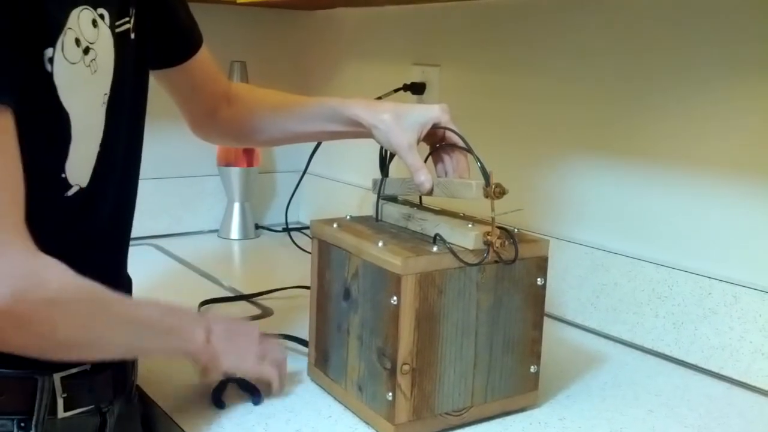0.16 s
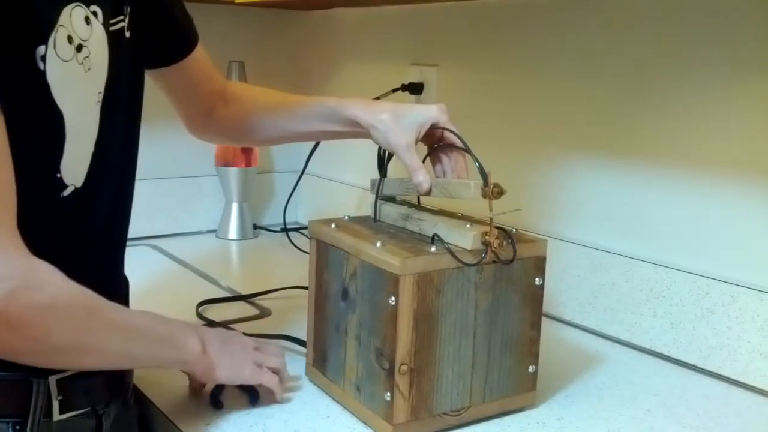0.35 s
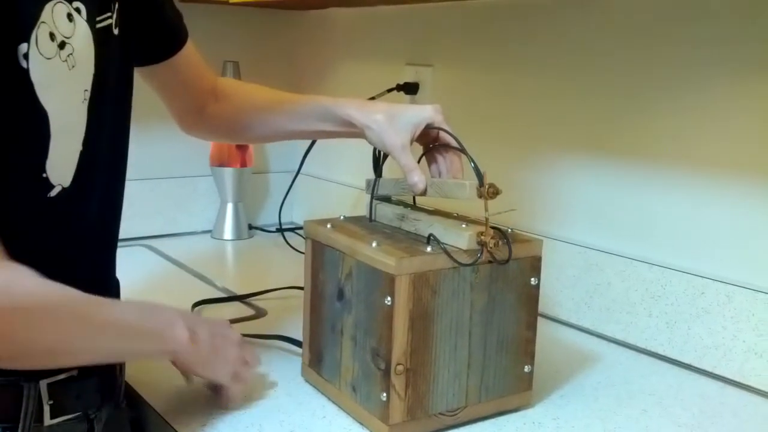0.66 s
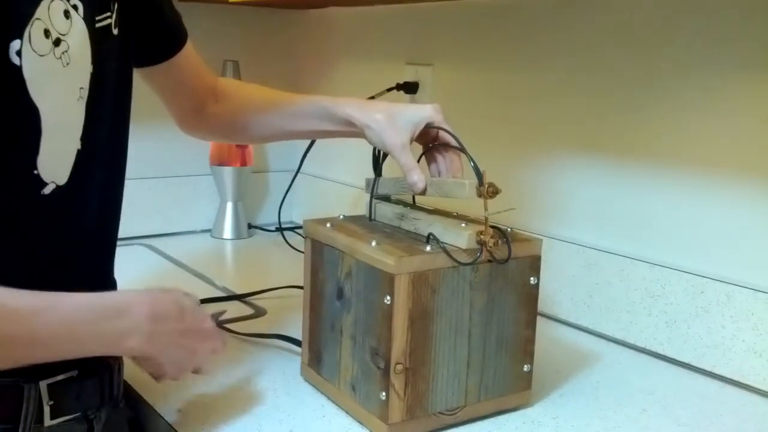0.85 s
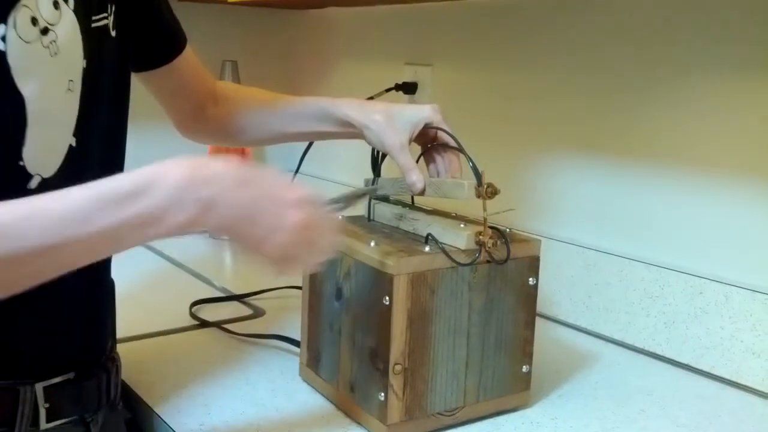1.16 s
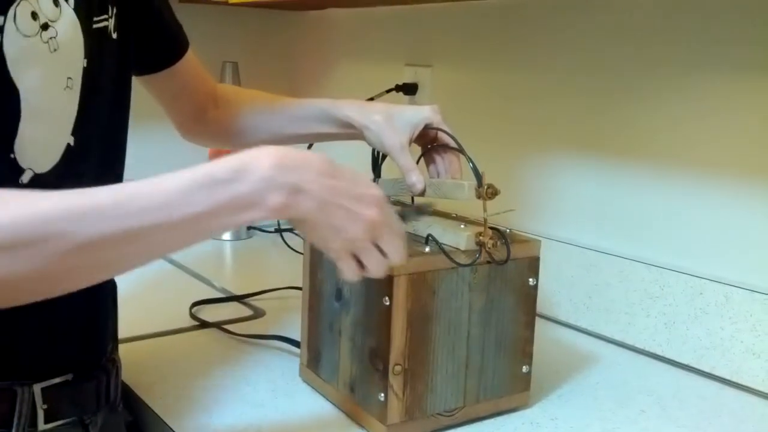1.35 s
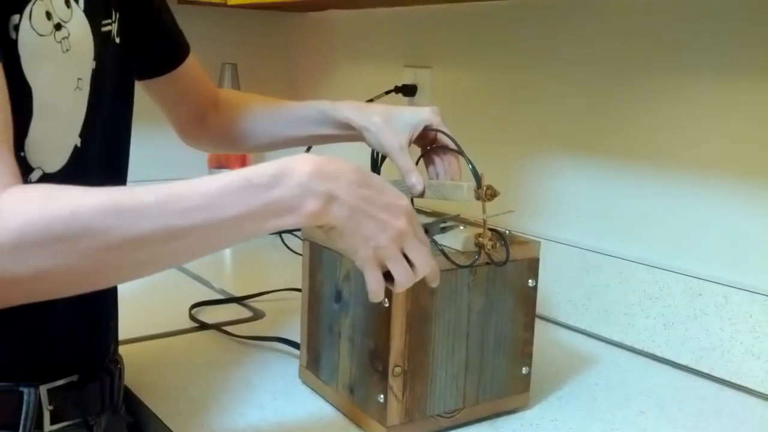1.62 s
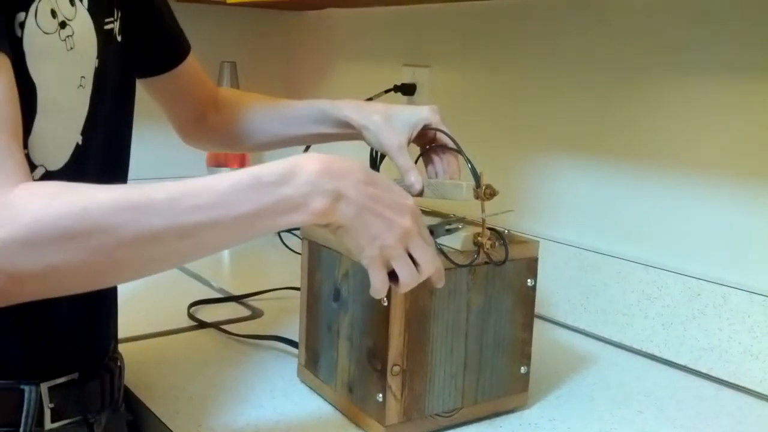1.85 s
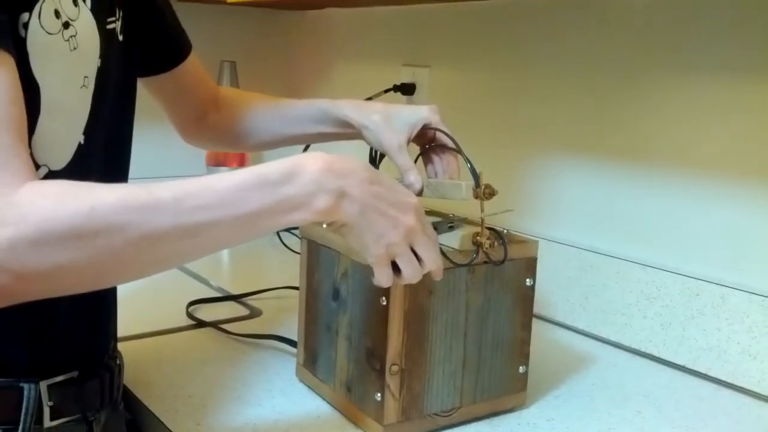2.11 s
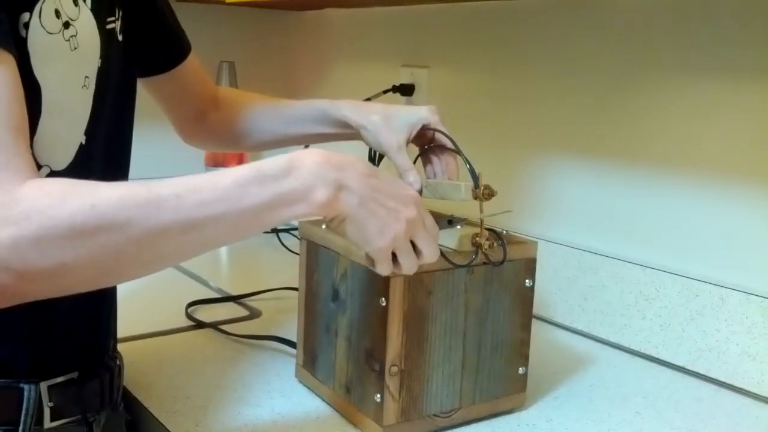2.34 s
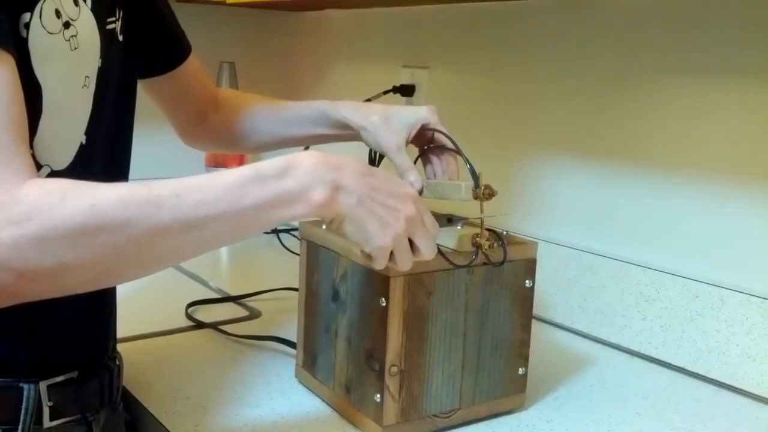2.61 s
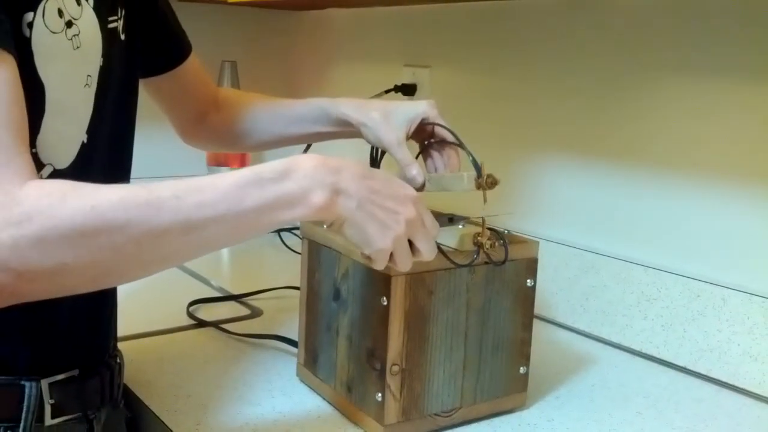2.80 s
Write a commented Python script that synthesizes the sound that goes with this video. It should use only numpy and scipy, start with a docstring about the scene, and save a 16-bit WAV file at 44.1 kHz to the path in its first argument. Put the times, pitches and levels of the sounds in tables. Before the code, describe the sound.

One sharp, bright click from small pliers comes at about 1.4 seconds. Before it, light scuffs and a soft bump mark the tool being picked off a counter. A faint metal touch follows at 2 seconds, then a small clink with a knock on a wooden box at 2.3. Soft rubbing and dull bumps come near 2.8. Low electrical hum and faint hiss fill the small room throughout.

```python
"""Light scuffs over mains hum and room rumble, as a hand picks small pliers off a counter in a small room.
The tool gives one sharp snap, then its metal rings in two small clinks as it is set against a homemade
spot welder, and the welder's wooden box rings with a knock. The scuffs are showers of tiny slips;
a few soft bumps wake only low modes. The recorder's own hiss, whine and faint regular ticks lie beneath."""
import sys
import numpy as np
from scipy import signal
from scipy.fft import rfft, irfft
from scipy.io import wavfile

SR = 44100
rng = np.random.default_rng(int(sys.argv[2]) if len(sys.argv) > 2 else 0)


def inscribe(sig):
    """Save sig as 16-bit PCM at rate SR to the path in sys.argv[1].

    A 1-D sig is mono; a 2-D sig holds one channel per row.
    Samples are clipped to [-1, 1] before scaling.
    """
    pcm = np.round(np.clip(np.atleast_2d(sig).T, -1, 1) * 32767)
    wavfile.write(sys.argv[1], SR, pcm.astype(np.int16))


N = 130977

# Room rumble and recorder hiss. Each row: frequency in Hz, level in dB per Hz.
NOISE_BED = [(15, -83), (30, -102), (70, -76.5), (110, -83), (165, -75.5), (205, -82.5), (255, -75),
             (340, -85.5), (430, -87), (600, -87.5), (1000, -90.5), (1700, -101), (3000, -104),
             (4800, -111), (8500, -111), (12500, -107), (14300, -103.5), (15700, -106)]
# A faint drone and the recorder's whine. Each row: centre in Hz, width in Hz, level in dB per Hz.
WHINE_BANDS = [(464, 10.5, -77), (6840, 58, -108), (10270, 113, -98), (12020, 33, -100), (13700, 71, -91.5),
               (15700, 38, -94.5)]
# Mains hum and faint machine tones. Each row: pitch in Hz, level in dB.
HUM_TONES = [(23, -63.5), (51.3, -60.5), (58.6, -61.5), (120, -51), (1124, -84), (1242, -100),
             (1301, -74.5), (2659, -94.5)]
HUM_WAVER_DEPTH, HUM_WAVER_HZ = 0.059, 4.4
# A hum overtone that swells late on. Each row: time in seconds, level in dB.
OVERTONE_HZ, OVERTONE_DB = 179, [(0, -62), (1.95, -65), (2.1, -56), (2.97, -60)]

# Fingers and tool scuff the counter, the hand drags dully on wood, and both rub on the box.
# Each row: start, rise and decay in seconds, level in dB.
SCUFFS = [(0, 0.0026, .03, -63), (.172, 0.0048, 0.015, -54.5), (.3, 0.022, 0.051, -60),
          (.418, 0.0052, .015, -64.5), (.747, 0.0034, 0.0062, -56.5)]
DRAGS = [(.165, 0.017, 0.043, -52), (2.787, 0.0096, 0.017, -50)]
RUBS = [(1.995, .01, .05, -62), (2.788, .01, .03, -55)]
# The tone of each kind of stroke. Each row: frequency in Hz, gain in dB.
SCUFF_EQ = [(200, 8), (1600, 4.5), (2200, 6.5), (2600, 1), (3100, 1), (4200, 2), (7000, -3), (12000, 0),
            (16000, -3)]
DRAG_EQ = [(20, -15), (60, -1), (170, 3), (270, -4), (600, -9), (1200, -15), (2500, -39), (8000, -62)]
RUB_EQ = [(100, -10), (550, 0), (800, -3), (1100, 4), (1350, -4), (1560, 3), (2200, -8), (4000, -22),
          (12000, -32)]
GRAINS_PER_S, GRAIN_SPREAD_DB = 2300, 3.5

TICK_FIRST_S, TICK_PERIOD_S = .1623, 1.2827
# The three pulses in a tick: their delays in seconds, then their levels in dB.
TICK_DELAYS_S = [0, .0066, .0384]
TICK_LEVELS_DB = [-26, -35, -36]
# The tick's thin, bright tone. Each row: frequency in Hz, gain in dB.
TICK_EQ = [(500, -41), (4000, -21), (7000, -9), (10500, -6.5), (13300, 5), (16000, -2)]

# Soft bumps on the counter and box. Each row: start in seconds, level in dB.
BUMPS = [(.775, -37), (1.44, -41.5), (2.793, -36), (2.938, -36.5)]
# Their dull ring. Each row: pitch in Hz, level in dB, seconds to fall by 60 dB.
BUMP_MODES = [(91, -1, 0.32), (155, -3, 0.12)]
BUMP_CONTACT_S = 0.0024

# The tool's snap. Its one row: start in seconds, level in dB.
SNAP = [(1.3682, -12)]
# Its hard, bright tone. Each row: frequency in Hz, gain in dB.
SNAP_EQ = [(300, -28), (1200, -9.5), (2200, -13.5), (3600, -2), (5200, -6.5), (7500, -8.5), (9500, -5),
           (11800, 0.5), (13500, -6), (16000, -11)]
SNAP_BASS_LAG_S = 0.00032

# Metal touches metal, then the plier tips catch and slip. Each row: start in seconds, level in dB.
TOUCHES = [(1.9937, -53), (1.9965, -52)]
CLINKS = [(2.3026, -45), (2.3053, -39), (2.3182, -47)]
# The tool lands on the box. Each row: start in seconds, level in dB, contact time in milliseconds.
KNOCKS = [(2.3180, -50.5, .02), (2.3200, -40.5, 0.16), (2.3237, -46, 0.1)]
# The ring of the touched metal, the tips, and the box with its fittings.
# Each row: pitch in Hz, level in dB, seconds to fall by 60 dB.
TOUCH_MODES = [(6540, -5, .035), (7780, -9, 0.066), (10440, -3, .035), (11250, -2, .022), (12500, -3, .015),
               (13050, -3, .015)]
CLINK_MODES = [(11300, 4, 0.0088), (12040, -1, 0.024), (12400, -2, .013), (12400, -9, .01),
               (15000, -8, .012), (15350, -6, 0.023)]
BOX_MODES = [(312, 2.5, 0.057), (367, -6, 0.12), (424, -14, .06), (554, -7, 0.1), (780, -11, 0.094),
             (1020, -5.5, 0.079), (1116, 1.5, 0.085), (1548, 0, 0.066), (1680, -15, 0.05),
             (2280, -10, 0.043), (2673, -11, .05), (2896, -3.5, 0.052), (3550, -6, 0.052),
             (8970, 7.5, .017)]
# The grit on each of those attacks. Each row: frequency in Hz, gain in dB.
TOUCH_CRACK_EQ = [(1000, 24), (5000, 2), (6500, 17), (12500, 16.5), (15500, 18)]
CLINK_CRACK_EQ = [(500, -4), (2000, 4), (2900, 9), (4200, 12), (6000, 3), (8300, -6), (11500, 22),
                  (15500, 13)]
BOX_CRACK_EQ = [(150, 5), (400, 33.5), (750, 35), (1100, 30.5), (2000, 29.5), (3400, 32), (4600, 22),
                (7500, 25.5), (9000, 24), (15000, 18)]

# Early reflections off nearby surfaces. Each row: delay in seconds, level in dB.
ECHOES = [(.0015, -56.5), (.0032, -10), (.0054, -23.5), (0.0083, -9)]
# The room's tail. Each row: frequency in Hz, seconds to fall by 60 dB.
ROOM_T60 = [(150, 0.49), (1000, 0.11), (4000, 0.13), (10000, 0.15), (16000, 0.089)]
ROOM_TAIL_DB = -1
BASS_CUT_HZ, TOP_EDGE_HZ = 18, 15850


def amp(db):
    """Decibels to gain."""
    return 10 ** (np.asarray(db) / 20)


def unit_rms(x):
    """Scales to an rms of one."""
    return x / np.sqrt(np.mean(x ** 2) + 1e-20)


def curve_at(points, hz):
    """Reads a curve along a logarithmic frequency axis."""
    point_hz, value = np.transpose(points)
    return np.interp(np.log(hz + 1), np.log(point_hz + 1), value)


def add(mix, start_s, sound):
    """Lays a sound into the mix at its cue."""
    part = mix[max(round(start_s * SR), 0):][:len(sound)]
    part += sound[:len(part)]


def impulses(rows):
    """One impulse for each row of start and level."""
    out = np.zeros(N)
    for start_s, db in rows:
        add(out, start_s, amp([db]))
    return out


def equalise(x, eq, size=4096):
    """Minimum-phase EQ: attacks stay sharp."""
    hz = abs(np.fft.fftfreq(size, 1 / SR))
    log_gain = np.log(amp(curve_at(eq, hz)))
    taps = np.fft.ifft(np.exp(np.conj(signal.hilbert(log_gain)))).real
    return signal.fftconvolve(x, taps[:size // 2])[:N]


def hum_and_hiss():
    """The bed: steady rumble and hiss, narrow whining bands of noise and gently wavering hum."""
    hz, t = np.fft.rfftfreq(N, 1 / SR), np.arange(N) / SR
    whine = sum(amp(db) ** 2 / (1 + ((hz - centre) / width * 2) ** 2)
                for centre, width, db in WHINE_BANDS)
    power = amp(curve_at(NOISE_BED, hz)) ** 2 + whine
    out = irfft(rfft(rng.standard_normal(N)) * np.sqrt(power * SR / 2), N)
    swell_db = np.interp(t, *np.transpose(OVERTONE_DB))
    for pitch, db in HUM_TONES + [(OVERTONE_HZ, swell_db)]:
        waver = unit_rms(irfft(rfft(rng.standard_normal(N)) * np.exp(-hz / HUM_WAVER_HZ), N))
        tone = np.sqrt(2) * np.sin(2 * np.pi * (pitch * t + rng.random()))
        out += amp(db) * (1 + HUM_WAVER_DEPTH * waver) * tone
    return out


def friction(strokes, eq):
    """Dense tiny slips that swell and die with each stroke."""
    t = np.arange(N) / SR
    grains = rng.standard_normal(N) * amp(GRAIN_SPREAD_DB * rng.standard_normal(N))
    grains *= rng.random(N) < GRAINS_PER_S / SR
    envelope = np.zeros(N)
    for start, rise, decay, db in strokes:
        attack = np.clip((t - start) / rise, 0, 1)
        release = np.exp(-np.maximum(t - start - rise, 0) / decay)
        envelope += amp(db) * attack * release
    return envelope * unit_rms(equalise(grains, eq))


def ticks():
    """Dry electrical ticks on a steady beat, each a pulse with two fainter ones in tow."""
    starts = np.arange(TICK_FIRST_S, N / SR, TICK_PERIOD_S)
    pulses = [(start + delay, db) for start in starts for delay, db in zip(TICK_DELAYS_S, TICK_LEVELS_DB)]
    return equalise(impulses(pulses), TICK_EQ)


def ring(modes):
    """The dying modes of a struck object; neighbours swing in opposite directions."""
    t = np.arange(SR // 2) / SR
    return sum((-1) ** k * amp(db - 60 * t / t60) * np.sin(2 * np.pi * hz * t)
               for k, (hz, db, t60) in enumerate(modes))


def bumps():
    """Slow, soft pushes that wake only the lowest modes."""
    t = np.arange(SR // 20) / SR
    push = t * np.exp(-t / (BUMP_CONTACT_S / 2))
    thud = np.convolve(ring(BUMP_MODES), push / push.sum())
    return signal.fftconvolve(impulses(BUMPS), thud)[:N]


def snap():
    """One sharp release of the tool; the metal carries treble faster than bass."""
    hz = np.fft.rfftfreq(N, 1 / SR)
    lag_s = SNAP_BASS_LAG_S * np.maximum(1 - hz / TOP_EDGE_HZ, 0)
    phase = 2 * np.pi * np.cumsum(lag_s) * SR / N
    force = irfft(rfft(impulses(SNAP)) * np.exp(-1j * phase), N)
    return equalise(force, SNAP_EQ)


def strike(modes, crack_eq, crack_s):
    """A short gritty crack of contact on top of the object's ring."""
    body = ring(modes)
    t = np.arange(len(body)) / SR
    crack = rng.standard_normal(len(t)) * np.exp(-t / crack_s)
    return body + equalise(crack / np.linalg.norm(crack), crack_eq)[:len(t)]


def metal_clinks():
    """Light touches of the tool, then the clink of its tips: quick clusters of high, short rings."""
    touches = signal.fftconvolve(impulses(TOUCHES), strike(TOUCH_MODES, TOUCH_CRACK_EQ, crack_s=.0017))
    clinks = signal.fftconvolve(impulses(CLINKS), strike(CLINK_MODES, CLINK_CRACK_EQ, crack_s=.0015))
    return (touches + clinks)[:N]


def box_knock():
    """Three quick contacts blend into one knock on the wooden box; a longer contact sounds duller."""
    out = np.zeros(N)
    for start_s, db, contact_ms in KNOCKS:
        hit = strike(BOX_MODES, BOX_CRACK_EQ, crack_s=.0046)
        softness = np.exp(-1000 / (contact_ms * SR))  # pole of a low-pass
        add(out, start_s, amp(db) * signal.lfilter([1 - softness], [1, -softness], hit))
    return out


def room(x):
    """The direct sound, echoes from counter and wall, and a short diffuse tail."""
    hz, t, noise = signal.stft(rng.standard_normal(SR // 2), SR, nperseg=256)
    decay = amp(-60 * t / curve_at(ROOM_T60, hz)[:, None])
    tail = signal.istft(noise * decay, SR, nperseg=256)[1]
    tail *= np.minimum(np.arange(len(tail)) / SR / 0.0023, 1)  # 2.3 ms fade-in
    direct_and_echoes = impulses([(0, 0.011)] + ECHOES)[:len(tail)]
    response = direct_and_echoes + amp(ROOM_TAIL_DB) * tail / np.linalg.norm(tail)
    return signal.fftconvolve(x, response)[:N]


def scene():
    """The mono mix: handling goes through the room; bumps, bed and ticks stay dry."""
    rubbing = friction(SCUFFS, SCUFF_EQ) + friction(DRAGS, DRAG_EQ) + friction(RUBS, RUB_EQ)
    handling = rubbing + snap() + metal_clinks() + box_knock()
    return (room(handling) + bumps() + hum_and_hiss() + ticks())[None]


def record(dry):
    """A bass cut and a steep roll-off at the very top."""
    bass_cut = signal.butter(4, BASS_CUT_HZ, "highpass", fs=SR, output="sos")
    top_cut = signal.firwin(511, TOP_EDGE_HZ, window=("kaiser", 9), fs=SR)
    return signal.oaconvolve(signal.sosfilt(bass_cut, dry), top_cut[None], "same")


dry = scene()
out = record(dry)
inscribe(out)
```